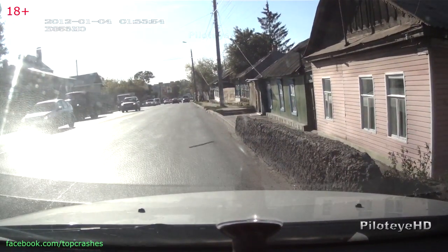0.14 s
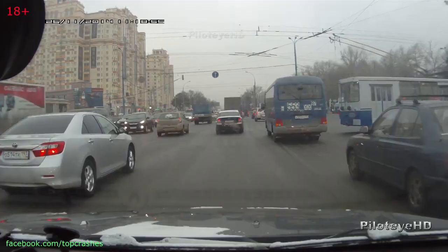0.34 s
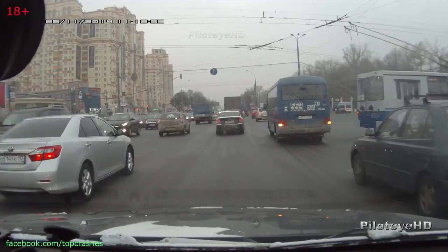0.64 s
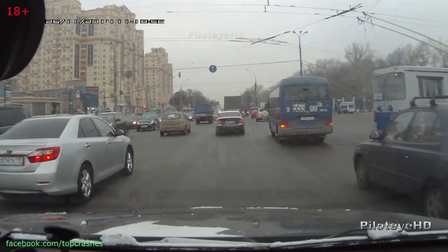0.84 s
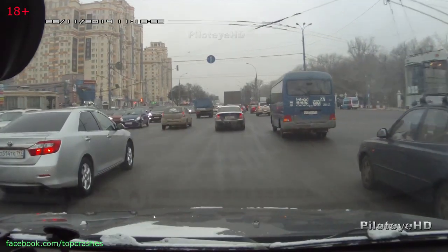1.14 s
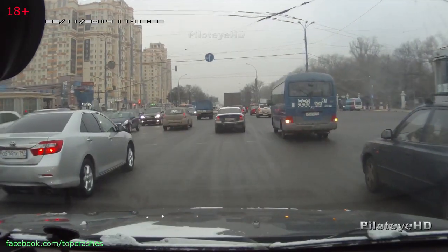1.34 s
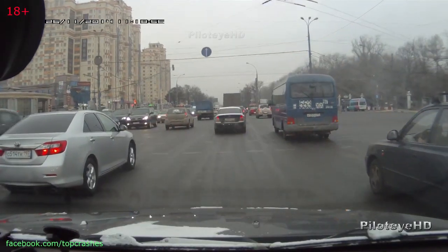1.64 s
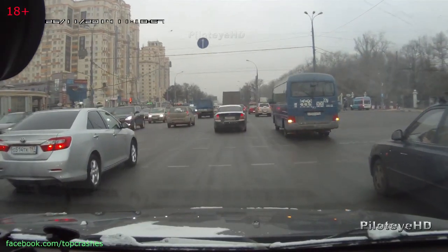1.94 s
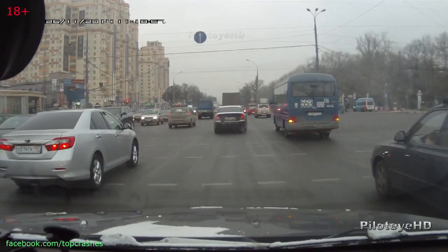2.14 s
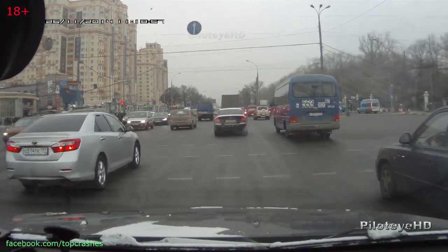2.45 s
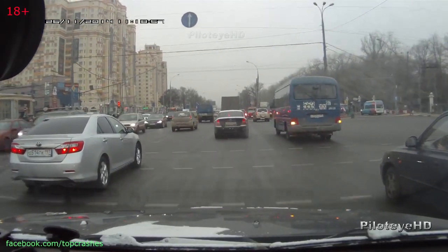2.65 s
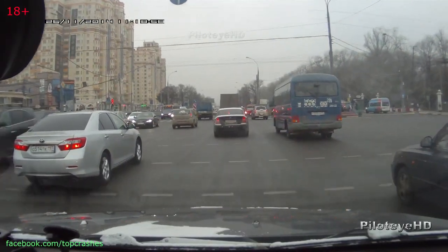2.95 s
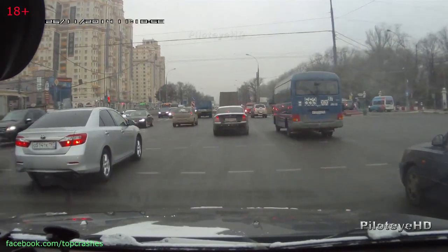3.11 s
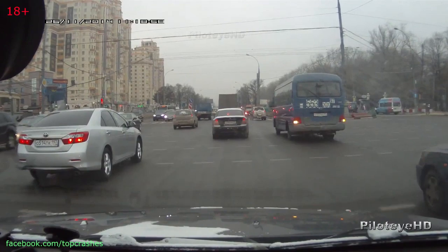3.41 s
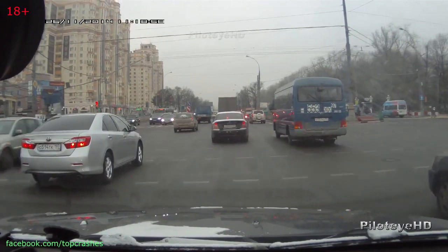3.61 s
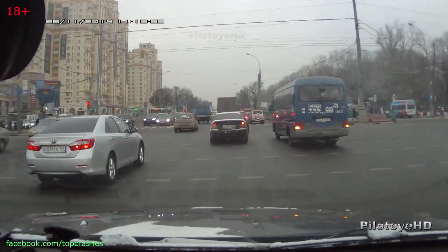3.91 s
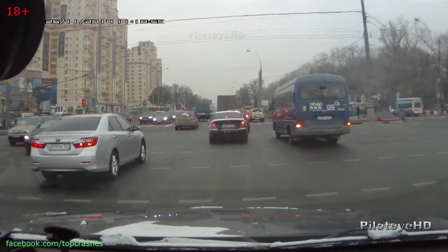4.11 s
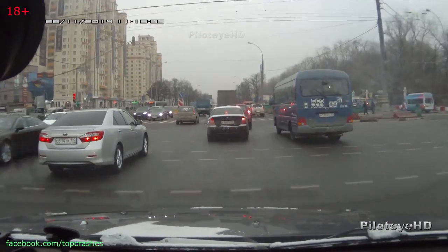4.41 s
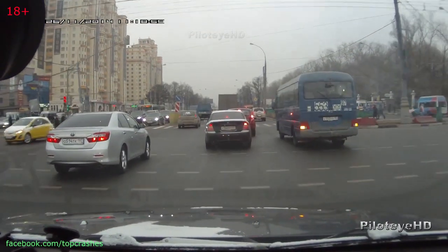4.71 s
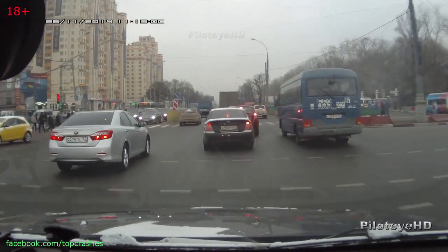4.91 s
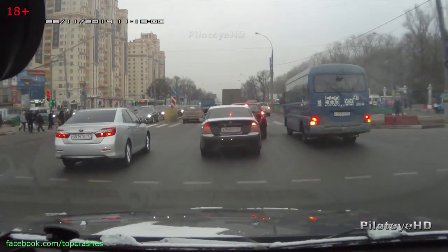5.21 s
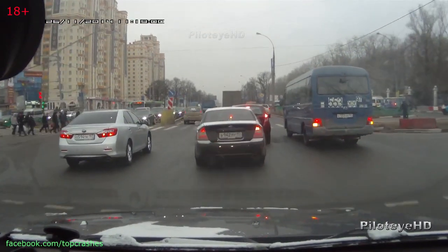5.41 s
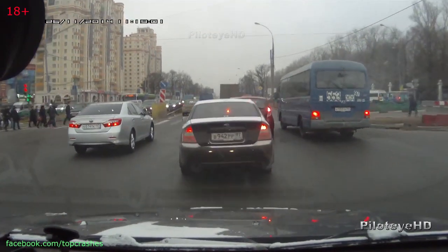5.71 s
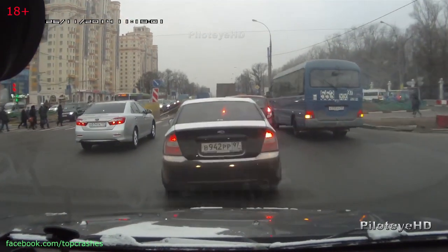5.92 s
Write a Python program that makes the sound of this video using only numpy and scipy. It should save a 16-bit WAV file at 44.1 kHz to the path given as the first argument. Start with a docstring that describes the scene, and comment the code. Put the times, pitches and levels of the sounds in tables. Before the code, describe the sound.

A dashboard microphone captures a small, damped car cabin on a wet city road. Bassy rumble and low engine drone waver with bumps, while loose trim ticks and chatters, most densely just before three seconds and again near five. Then hard braking brings heavier boom, sharper rattles and a rough watery tyre scrub until the end. Everything sits on the right; the left has only faint hiss.

```python
"""A car cabin rumbles and booms through city traffic, and the tyres scrub the wet road as the car brakes hard.
Shaped noise makes the rumble, boom, floor drone, tyre rush, scrub and hiss; gliding sines make the engine hum
and a brief whistle, and steady sines a thin whine. A loose plastic part rattles in bursts: clusters of impulses
ring its resonances and the dashboard panel. All of it sits on the right; the left holds faint hiss and an offset."""
import sys
import numpy as np
from scipy import signal
from scipy.fft import rfft, irfft, next_fast_len
from scipy.io import wavfile
from scipy.ndimage import uniform_filter1d, map_coordinates

SR = 44100
rng = np.random.default_rng(int(sys.argv[2]) if len(sys.argv) > 2 else 0)


def wav_record(signal):
    """Record a signal, one row per channel, as 16-bit PCM in the file named by sys.argv[1]."""
    frames = np.transpose(np.atleast_2d(signal))
    bounded = np.clip(frames, -1, 1)
    # unit amplitude maps onto the largest positive 16-bit level
    quanta = np.round(bounded * 32767).astype(np.int16)
    wavfile.write(sys.argv[1], SR, quanta)


N = 267157

# Source levels are set ahead of the microphone gain; spectra and resonances give relative gains.
# Road drive: (time [s], body shake [dB], cabin boom before thumps [dB], floor drone before thumps [dB])
ROAD_DRIVE = [(0.35, -25.5, -32.5, -37.5), (0.65, -33, -37.5, -40.5), (1.1, -22, -34.5, -40),
              (1.6, -23.5, -31.5, -37.5), (1.85, -30.5, -32.5, -38.5), (2.09, -23.5, -33, -38.5),
              (2.25, -28, -35, -39), (2.45, -19, -38, -39.5), (2.62, -25.5, -32.5, -39),
              (2.85, -20, -29.5, -36), (3.18, -33.5, -32.5, -37.5), (3.5, -21, -33, -36.5),
              (3.65, -25.5, -32.5, -39), (4.4, -26.5, -36.5, -37.5), (4.98, -18.5, -32.5, -37.5),
              (5.13, -29.5, -38.5, -40), (5.19, -18, -23.5, -33.5), (5.33, -20, -19.5, -31),
              (5.43, -24, -31, -31.5), (5.54, -20.5, -20, -32), (5.75, -18, -18, -31),
              (5.87, -23.5, -20.5, -35), (5.97, -14.5, -27.5, -32.5), (6.05, -17, -23, -28.5)]
# Single bumps that thump the cabin: (time [s], boom rise [dB])
CABIN_BUMPS = [(0.69, 9.5), (1.11, 4), (1.72, 3.5), (3.22, 10), (3.41, 4.5), (4.42, 9), (5.1, 9), (5.6, 3),
               (5.8, 4), (5.89, 2)]
# Spectrum of the body rumble: (frequency [Hz], gain [dB])
SHAKE_SPECTRUM = [(10, -6), (20, 10), (30, 6), (48, 7.5), (60, -5), (85, -6), (150, -19.5), (250, -41),
                  (600, -120)]
# Cabin air modes, applied twice: (frequency [Hz], width of one pass [Hz], gain of one pass [dB])
CABIN_MODES = [(93.3, 18.4, -1.5), (127.2, 14.1, 0)]
# Spectrum of the floor-pan drone: (frequency [Hz], gain [dB])
DRONE_SPECTRUM = [(82, -44), (140, -5), (151, -5.5), (210, -7), (242, -10.5), (302, -10), (520, -19),
                  (680, -75), (1140, -120)]
# Spectrum of the tyre rush: (frequency [Hz], gain [dB])
TYRE_SPECTRUM = [(310, -10.5), (520, -1.5), (546, -2), (1010, -2.5), (1330, -12.5), (1970, -27.5),
                 (2200, -35), (2860, -58), (4840, -120)]
# Spectrum of the steady hiss: (frequency [Hz], gain [dB])
HISS_SPECTRUM = [(1200, -19), (2000, -3), (2600, 5.5), (3000, -1), (3480, 2), (4200, -8.5), (5500, -6.5),
                 (6800, -9), (7150, 0), (7600, -6.5), (8900, -15.5), (10000, -9.5), (11200, -20),
                 (15500, -42.5)]
# Engine firing tone: (time [s], pitch [Hz], level [dB])
ENGINE_TONE = [(0.4, 78, -36.5), (0.87, 63.9, -32.5), (2.1, 64.5, -35.5), (2.5, 75.7, -37.5),
               (2.7, 76, -39), (2.95, 67, -36.5), (4.04, 66.8, -30.5), (4.75, 77.5, -45.5),
               (5.0, 66.1, -34.5), (5.22, 64.2, -27), (5.4, 63.25, -40), (5.5, 62.86, -25),
               (5.8, 66.6, -22.5), (6.05, 61.7, -23)]
# Thin electronic tones: (pitch [Hz], rms level [dB])
WHINE_TONES = [(7000, -85), (7140, -86), (7180, -84.5), (14303, -88)]
# Rattle bursts: (start [s], relative level [dB], treble against body [dB], length [s])
RATTLE_BURSTS = [(0.498, -51, -13, .008), (0.603, -36, -17, 0.0036), (0.629, -40, -21, 0.0041),
                 (.639, -43, -13, 0.0042), (0.662, -29.5, -15, 0.0047), (0.682, -35.5, -14, 0.0039),
                 (0.692, -45, -9, 0.0084), (0.717, -48.5, -24, .0075), (1.042, -46.5, -16, .0038),
                 (1.076, -52, -18, 0.0056), (1.091, -41, -21, .0038), (1.279, -48, -8, 0.0023),
                 (1.34, -31.5, -8.5, 0.0042), (1.353, -37, -20, .0049), (1.369, -36, -15, 0.0031),
                 (1.3775, -32, -13, 0.0075), (1.392, -33.5, -21, .0048), (1.401, -31.5, -15, 0.0032),
                 (1.409, -33, -18, .0042), (1.4302, -35.5, -10.5, .0041), (1.4495, -37, -16, 0.0055),
                 (1.4703, -31, -16, 0.0046), (1.569, -39, -17, 0.0031), (1.65, -45, -16, 0.0038),
                 (1.683, -44, -24, 0.0057), (1.8027, -39, -17, .0034), (1.8356, -32, -19, 0.0024),
                 (1.8688, -30.5, -16, 0.0039), (1.892, -37, -14.5, 0.0074), (1.9147, -39, -15, 0.014),
                 (2.0867, -37.5, -18, 0.0036), (2.095, -40, -22, 0.0084), (2.1143, -33.5, -14, 0.0061),
                 (2.123, -40, -11, 0.0057), (2.1463, -46, -16, 0.0071), (2.2324, -43.5, -10, .0035),
                 (2.251, -40, -21, 0.0032), (2.2765, -40, -19, 0.0035), (2.584, -44, -15, 0.0036),
                 (2.6093, -38.5, -16, .0033), (2.6176, -37.5, -16, 0.0036), (2.637, -34, -17, .003),
                 (2.643, -38, -15, 0.011), (2.674, -31.5, -15, 0.0047), (2.6982, -24.5, -16, 0.0045),
                 (2.715, -27.5, -21, 0.0033), (2.726, -28.5, -17, 0.0076), (2.756, -27.5, -15.5, 0.0085),
                 (2.782, -23, -17, 0.01), (2.81, -29, -13, .012), (2.8336, -23, -18, 0.0071),
                 (2.8616, -31, -17, 0.01), (2.889, -27, -16.5, 0.011), (2.914, -27, -14, 0.0086),
                 (2.936, -26.5, -13, 0.0044), (2.9465, -35, -19, .0044), (2.9647, -24.5, -12, 0.0043),
                 (2.993, -33.5, -10.5, 0.0051), (3.019, -34, -17, 0.0038), (3.028, -33, -18, 0.0038),
                 (3.039, -31, -19, 0.0033), (3.044, -37, -13, 0.0084), (3.056, -30.5, -15, .0044),
                 (3.081, -43.5, -17, 0.0067), (3.1986, -46, -21, .003), (3.2066, -32.5, -22, .0048),
                 (3.2305, -36, -13.5, 0.0041), (3.238, -40.5, -13, 0.0091), (3.256, -42, -10, 0.0031),
                 (3.4798, -34, -11, 0.0024), (3.544, -45, -28, 0.0042), (3.734, -48, -19, 0.0051),
                 (3.75, -46.5, -17, .01), (3.768, -37, -12.5, .0043), (3.7952, -32.5, -14.5, 0.0044),
                 (3.807, -42, -10, 0.0037), (3.8698, -31.5, -15, 0.0043), (3.925, -41, -13, 0.0043),
                 (4.078, -46, -11, .0036), (4.1127, -26.5, -15, 0.0059), (4.1338, -37.5, -32, .013),
                 (4.138, -22.5, -13.5, 0.0055), (4.163, -39, -13, 0.0099), (4.191, -33, -12, 0.0092),
                 (4.222, -47, -23, 0.0021), (4.3, -48, -10, .0044), (4.4247, -44.5, -23, .004),
                 (4.558, -44.5, -19, .0048), (4.568, -40, -12, 0.0035), (4.5898, -41.5, -13, .0086),
                 (4.62, -38, -24, .0038), (4.628, -35, -13, 0.0059), (4.657, -24.5, -10, 0.0028),
                 (4.694, -41, -16, .006), (4.709, -37, -22, .0032), (4.7187, -23, -13, 0.0074),
                 (4.735, -27, -13, 0.0044), (4.7497, -23, -15, .0035), (4.7693, -27, -23, 0.0023),
                 (4.7762, -21, -16, .0051), (4.802, -28.5, -16, 0.003), (4.807, -31, -15, 0.0069),
                 (4.8587, -32, -11, .0031), (4.877, -29.5, -6, 0.0042), (4.8865, -35, -13, .0079),
                 (4.906, -25, -20, .0099), (4.9224, -31, -18, 0.0079), (4.9364, -34, -15, 0.015),
                 (4.951, -30.5, -16, 0.0074), (4.965, -37, -20, 0.0035), (4.971, -33.5, -13, 0.0067),
                 (4.989, -32, -14, 0.0029), (5.062, -43.5, -9, .0037), (5.086, -44, -8, 0.0032),
                 (5.2123, -45.5, -7, .0047), (5.2446, -23.5, -5.5, .014), (5.2662, -18.5, -3, 0.0045),
                 (5.2971, -35, -17, 0.012), (5.3305, -23, -10, .003), (5.336, -29.5, -13, 0.0065),
                 (5.452, -37.5, -5, .005), (5.4606, -30.5, -10, .0046), (5.4718, -30, -14, 0.012),
                 (5.514, -38, -23, 0.0049), (5.5293, -24.5, -9.5, .0034), (5.544, -23.5, -19, 0.0067),
                 (5.576, -28.5, -5, .011), (5.5943, -18, -2, 0.0075), (5.6103, -17, -5, 0.0056),
                 (5.6226, -22.5, -18, 0.004), (5.6343, -24, -18, 0.012), (5.6663, -26.5, -12.5, 0.0077),
                 (5.6896, -32.5, -25, 0.0052), (5.706, -43, -17, .0037), (5.727, -46, -13, .0042),
                 (5.738, -37, -12, 0.007), (5.762, -27.5, -14.5, 0.0086), (5.7886, -42, -17, 0.0081),
                 (5.8144, -30, -11, 0.0067), (5.824, -37, -19, .0044), (5.8855, -36.5, -17, .0038),
                 (5.9132, -36.5, -17, 0.0051), (5.937, -48, -6, .0051), (5.971, -31, -19, .0044),
                 (5.981, -43, -19, .0039), (5.99, -42, -7, 0.0063), (6.004, -29.5, -25, 0.0076),
                 (6.017, -28, -14, 0.003), (6.0303, -27.5, -15, 0.006)]
# Ring of the loose plastic part: (frequency [Hz], width [Hz], gain [dB])
PLASTIC_MODES = [(2802, 326, -2), (3067, 245, 2.5), (3460, 580, 1), (4130, 400, 3.5), (4900, 690, -4.5),
                 (6050, 310, -8.5)]
# Treble ring of the plastic part: (frequency [Hz], width [Hz], gain [dB])
EDGE_MODES = [(7050, 1820, -4.5), (7640, 530, 4), (8540, 640, -4), (10100, 1100, -7), (11700, 1100, -15.5)]
# Top ring, strong only in the brightest bursts: (frequency [Hz], width [Hz], gain [dB])
SNAP_MODES = [(13700, 5600, -4.5), (15000, 1200, -8)]
# Ring of the dashboard panel that it knocks: (frequency [Hz], width [Hz], gain [dB])
PANEL_MODES = [(465, 132, 5.5), (990, 170, -0.5), (1370, 333, -2), (2180, 130, -7)]
# Faint brief whistle: (time [s], pitch [Hz], level [dB])
WHISTLE_GLIDE = [(3.24, 3430, -100), (3.28, 3440, -74), (3.45, 3450, -69), (3.66, 3428, -74),
                 (3.7, 3444, -100)]
# Tyre scrub on the wet road under braking: (time [s], level [dB])
SCRUB_LEVEL = [(4.6, -78), (4.9, -50), (5.05, -52.5), (5.2, -45), (5.4, -45.5), (5.6, -38.5), (5.8, -44),
               (6.05, -42)]
# Spectrum of the wet scrub: (frequency [Hz], gain [dB])
SPRAY_SPECTRUM = [(200, -41), (300, 21), (450, 19), (560, 7), (950, 9), (1080, 19.5), (1200, 8.5),
                  (2200, -2.5), (3530, -4), (4630, -6.5), (6060, -4.5), (7680, -3.5), (10500, -14),
                  (15900, -34)]

START_S, TOP_HZ = .298, 15900  # the sound switches on; the upper band limit
MIC_DB, HISS_DB = 7.5, -64.5
BUMP_S = 0.032  # time from the peak of a thump's dB rise to 1/e of it
BOOM_DB, TYRES_DB = -34.5, -44  # reference boom, and the tyre rush that goes with it
TYRES_FOLLOW = 0.24  # dB of tyre rush per dB of boom
REBOUND_S, REBOUND_DB = .012, -16  # typical gap and level of the rebound after each burst
# Bright and long bursts knock the panel more: base [dB], dB per dB of treble, dB per s of length, scatter [dB]
KNOCK_DB, KNOCK_PER_TREBLE, KNOCK_DB_PER_S, KNOCK_SCATTER_DB = -14.5, 0.35, 702, 1
BUZZ_DB, BUZZ_S = -15, 0.068  # fine buzz relative to mean burst level, and each averaging time


def amp(db):
    """dB to gain."""
    return 10 ** (np.asarray(db) / 20)


def unit(x):
    """x at rms 1."""
    return x / np.sqrt(np.mean(x ** 2) + 1e-20)


def curves(rows):
    """One value per sample for each column after the time."""
    s, *cols = np.transpose(rows)
    return [np.interp(np.arange(N) / SR, s, c) for c in cols]


def wobble(rate):
    """A smooth random curve, rate knots a second."""
    knots = rng.standard_normal(int(N * rate / SR) + 4)
    return map_coordinates(knots, [np.arange(N) * rate / SR])


def filtered(x, response):
    """x times a complex response of frequency."""
    m = next_fast_len(N + SR // 2)  # room for the ring to die away
    return irfft(rfft(x, m) * response(np.fft.rfftfreq(m, 1 / SR)), m)[..., :N]


def colour(points):
    """Gain of (Hz, dB) points on a log axis."""
    hz, db = np.transpose(points)
    return lambda f: amp(np.interp(np.log(f + 1), np.log(hz + 1), db))


def modes(rows):
    """Causal response of (Hz, width, dB) resonances, with alternating signs."""
    def response(f):
        total = 0
        for k, (centre, width, db) in enumerate(rows):
            band = 1j * f * width
            total = total + (-1) ** k * amp(db) * band / (centre * centre - f * f + band)
        return total
    return response


def rush(response, patchy_db):
    """Coloured noise of rms 1 with patches of random gain."""
    cells = signal.stft(rng.standard_normal(N), nperseg=512)[2]
    field = rng.standard_normal(cells.shape)
    field = uniform_filter1d(uniform_filter1d(field, 5, 0), 12, 1)
    patchy = signal.istft(cells * amp(patchy_db * unit(field)), nperseg=512)[1][:N]
    return unit(filtered(patchy, response))


def tone(hz, db, phase=0):
    """A sine of gliding pitch, with db as its rms level."""
    return np.sqrt(2) * amp(db) * np.sin(2 * np.pi * np.cumsum(hz) / SR + phase)


def body_shake(db, bumps):
    """The road shakes the body into a low rumble."""
    return amp(db + .8 * bumps) * rush(colour(SHAKE_SPECTRUM), patchy_db=0.34)


def cabin_boom(db, bumps):
    """The road excites resonances of the cabin air."""
    return amp(db + 1.8 * bumps) * rush(lambda f: modes(CABIN_MODES)(f) ** 2, patchy_db=1.13)


def floor_drone(db, bumps):
    """The road drives a drone in the floor pan."""
    return amp(db + 1.42 * bumps) * rush(colour(DRONE_SPECTRUM), patchy_db=0.57)


def tyre_rush(boom_db, bumps):
    """Rolling tyres rush louder as the boom rises."""
    db = TYRES_DB + TYRES_FOLLOW * (boom_db - BOOM_DB)
    return amp(db + 1.45 * bumps + 0.29 * wobble(30)) * rush(colour(TYRE_SPECTRUM), patchy_db=0.57)


def road():
    """One road unevenness drives rumble, boom, drone and tyres; single bumps swell all but the rumble."""
    shake_db, boom_db, drone_db = curves(ROAD_DRIVE)
    t = np.arange(N) / SR
    thump_db = sum(db * np.exp(-((t - s) / BUMP_S) ** 2) for s, db in CABIN_BUMPS)
    boom_db = boom_db + thump_db
    drone_db = drone_db + 0.3 * thump_db
    bumps = wobble(9)
    low = body_shake(shake_db, bumps) + cabin_boom(boom_db, bumps) + floor_drone(drone_db, bumps)
    return low + tyre_rush(boom_db, bumps)


def hiss():
    """Steady coloured noise with a slightly patchy texture."""
    return amp(HISS_DB) * rush(colour(HISS_SPECTRUM), patchy_db=1.2)


def engine():
    """The firing tone glides in pitch and wavers a little."""
    hz, db = curves(ENGINE_TONE)
    return tone(hz * (1 + .012 * wobble(9.2)), db + 0.65 * wobble(14))


def whine():
    """Thin electronic tones that waver in strength and phase."""
    return sum(tone(np.full(N, hz), db + 1.1 * wobble(7.4), .3 * wobble(13)) for hz, db in WHINE_TONES)


def bursts():
    """Every burst and its weaker rebound: start, level, treble, knock and length."""
    s, db, treble_db, length = np.transpose(RATTLE_BURSTS)
    chance = rng.standard_normal((4, len(s)))
    s = np.r_[s, s + length + REBOUND_S * np.exp(.5 * chance[0])]
    db = np.r_[db, db + REBOUND_DB + 4 * chance[1]]
    treble_db = np.r_[treble_db, treble_db - 3]
    length = np.r_[length, np.minimum(length, .0045)]
    knock_db = KNOCK_DB + KNOCK_PER_TREBLE * treble_db + KNOCK_DB_PER_S * length
    knock_db = knock_db + KNOCK_SCATTER_DB * chance[2:].ravel()
    return np.array([s, db, treble_db, knock_db, length])[:, :, None]


def contact_buzz(s, db, length):
    """Sparse clumped contacts buzz finely, following the smoothed energy of the bursts."""
    ticks = (rng.random(N) < 1500 / SR) * rng.standard_normal(N) * amp(9.4 * wobble(60))
    at = np.minimum(s * SR, N - 1).astype(int).ravel()
    energy = np.bincount(at, (amp(2 * db) * length * SR).ravel(), N)
    span = int(BUZZ_S * SR)
    smooth = uniform_filter1d(uniform_filter1d(energy, span), span)
    return amp(BUZZ_DB) * np.sqrt(abs(smooth)) * unit(ticks)


def cabin_reflections(dry):
    """Short damped reflections of the cabin, added to the direct sound."""
    t = np.arange(SR // 10) / SR
    tail = rng.standard_normal(len(t)) * amp(-60 * t / 0.042)  # falls 60 dB in 42 ms
    return dry + amp(-10.5) * signal.fftconvolve(dry, tail / np.linalg.norm(tail))[:N]


def rattle(count=22):
    """Each burst is a chatter of sharp uneven bounces that ring the part and the panel."""
    s, db, treble_db, knock_db, length = bursts()
    draw = rng.random((len(s), 5, count))
    stage = 2.6 * draw[:, 0] - .7  # 0 to 1 is the chatter, with weaker bounces before and after
    outside_db = 26 * np.clip(-stage, 0, None) + 17 * np.clip(stage - 1, 0, None)
    share = amp(-13 * draw[:, 1] - 4.1 * stage - outside_db)
    # a longer burst holds more energy
    size = amp(db) * share * np.sqrt(length / np.sum(share ** 2, axis=1, keepdims=True))
    chatter = np.clip(length - .0022, .0006, .02)  # leaves time for the last bounce to ring
    at = np.round((s + .0008 + stage * chatter) * SR).astype(int)
    at = np.clip(at, 0, N - 1).ravel()
    side = np.sign(draw[:, 2:] - .5)  # each bounce starts each group of modes either way

    def blows(rel_db, axis):
        """Impulses of all bounces, with the signs of one group of modes."""
        return np.bincount(at, (size * amp(rel_db) * side[:, axis]).ravel(), N)

    def soft(f):
        """A yielding contact dulls the blow."""
        return 1 / (1 + 1j * f / 7000) ** 2

    def no_bass(f):
        """A light part moves no bass."""
        return (1j * f / 450) ** 2 / (1 + 1j * f / 450) ** 2

    buzz = contact_buzz(s, db, length)
    body_drive = amp(53.5) * blows(0, axis=0) + amp(2.0) * buzz
    edge_drive = amp(60) * blows(treble_db, axis=1) + amp(-13) * buzz
    body = filtered(body_drive, lambda f: modes(PLASTIC_MODES)(f) * soft(f))
    edge = filtered(edge_drive, lambda f: modes(EDGE_MODES)(f) * soft(f))
    snap = amp(40) * filtered(blows(2 * treble_db, axis=0), modes(SNAP_MODES))
    panel = amp(65.0) * filtered(blows(knock_db, axis=2), lambda f: modes(PANEL_MODES)(f) * soft(f))
    return cabin_reflections(filtered(body + edge + snap + panel, no_bass))


def whistle():
    """A faint brief tone that glides and wavers."""
    hz, db = curves(WHISTLE_GLIDE)
    return tone(hz, db + 2.5 * wobble(25), 1.2 * wobble(40))


def scrub():
    """Tyres scrub the wet road under braking: coloured noise of uneven strength."""
    db = curves(SCRUB_LEVEL)[0]
    return amp(db + .8 * wobble(20)) * rush(colour(SPRAY_SPECTRUM), patchy_db=1)


def scene():
    """All reaches one microphone, wired to the right channel."""
    sources = road() + hiss() + engine() + whine() + rattle() + whistle() + scrub()
    return np.array([np.zeros(N), amp(MIC_DB) * sources])


def record(dry):
    """Loud peaks flatten, the idle left channel holds an offset and faint hiss, and the top is cut off."""
    clipped = dry / (1 + (dry / .84) ** 12) ** (1 / 12)  # peaks stay within 0.84
    idle_colour = colour([(20, 20), (300, 0), (11000, -2), (14000, 6)])  # (frequency [Hz], gain [dB])
    clipped[0] = amp(-87) * rush(idle_colour, patchy_db=3) - .00067
    on = np.clip((np.arange(N) / SR - START_S) / 0.0028, 0, 1)  # 2.8 ms fade-in
    return filtered(on * clipped, lambda hz: hz < TOP_HZ)


dry = scene()
out = record(dry)
wav_record(out)
```